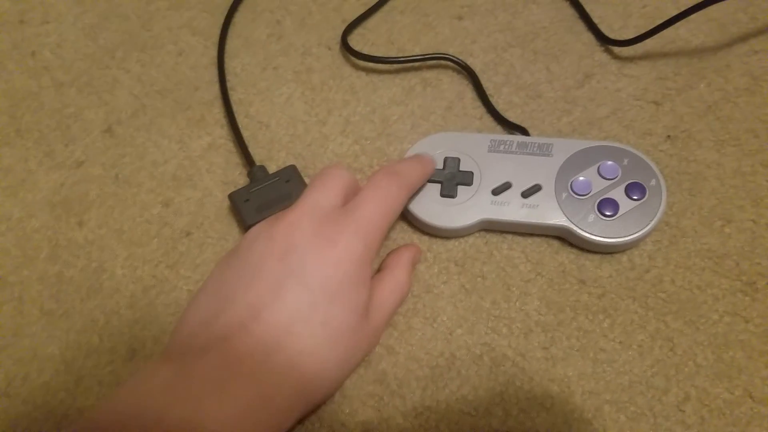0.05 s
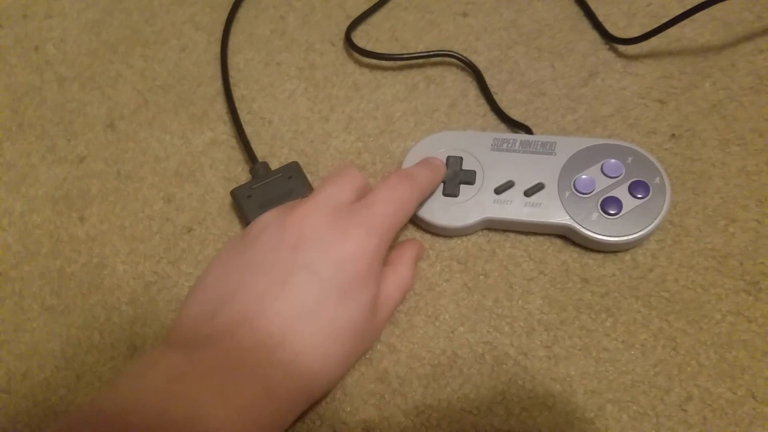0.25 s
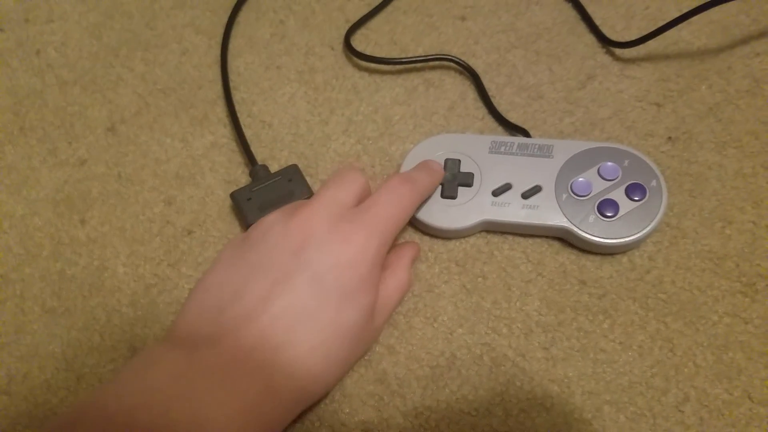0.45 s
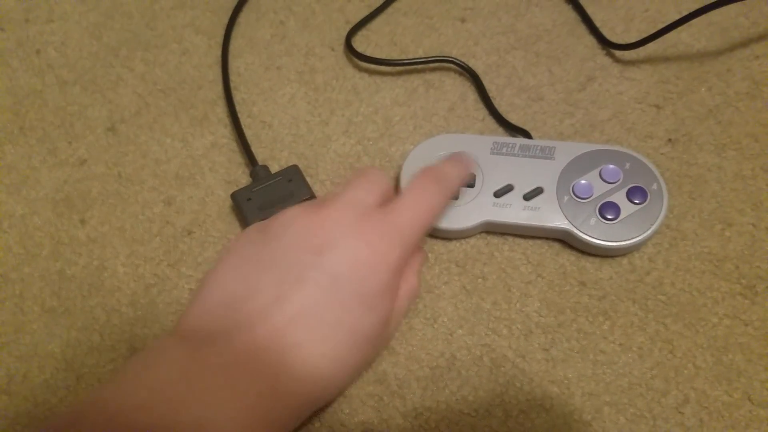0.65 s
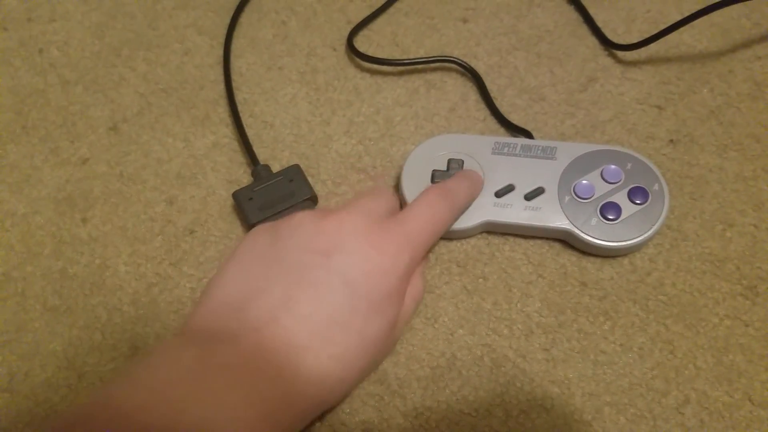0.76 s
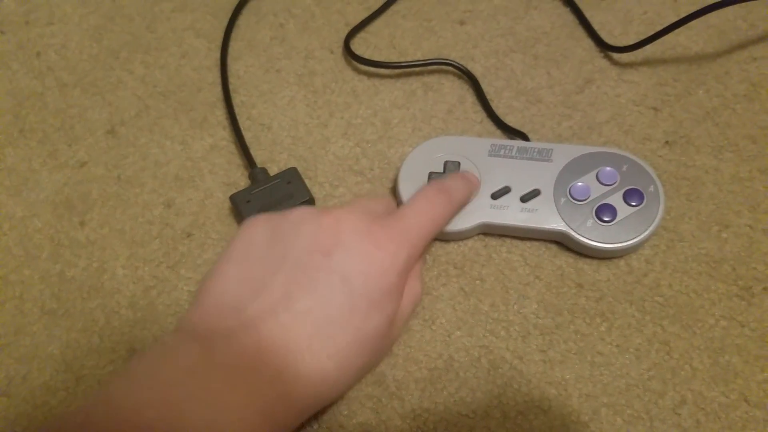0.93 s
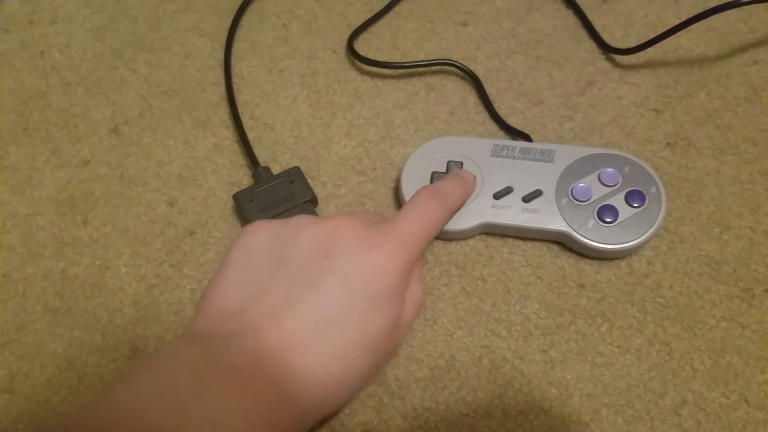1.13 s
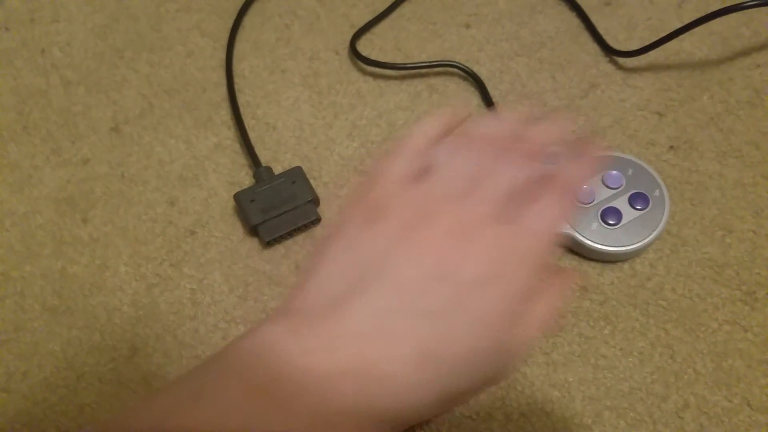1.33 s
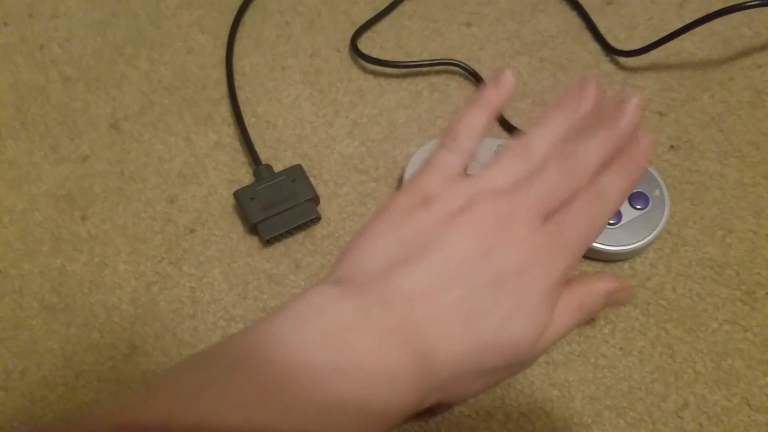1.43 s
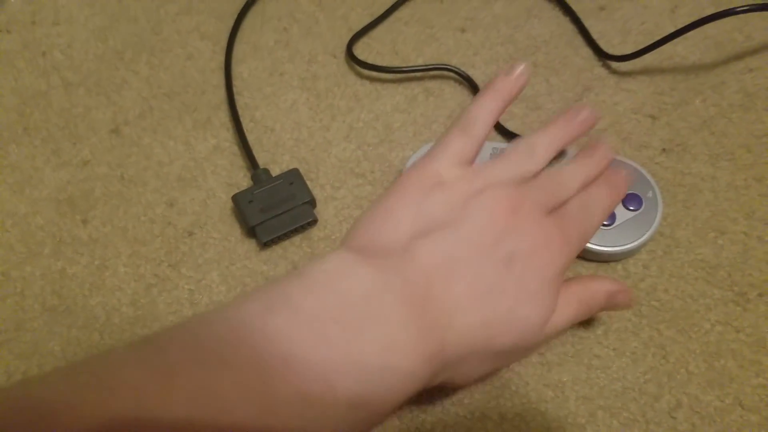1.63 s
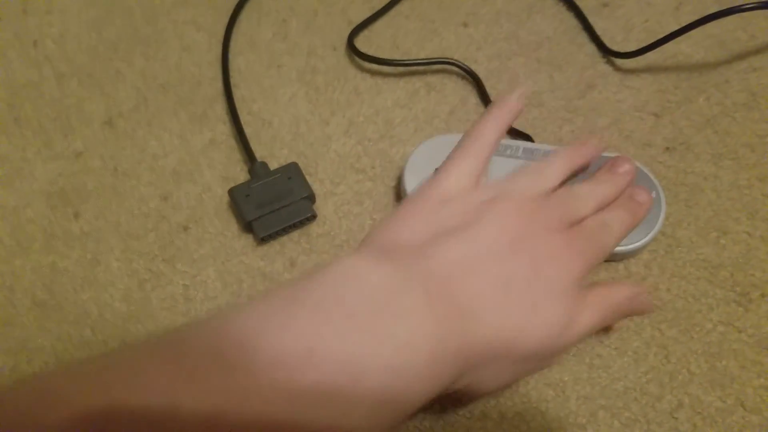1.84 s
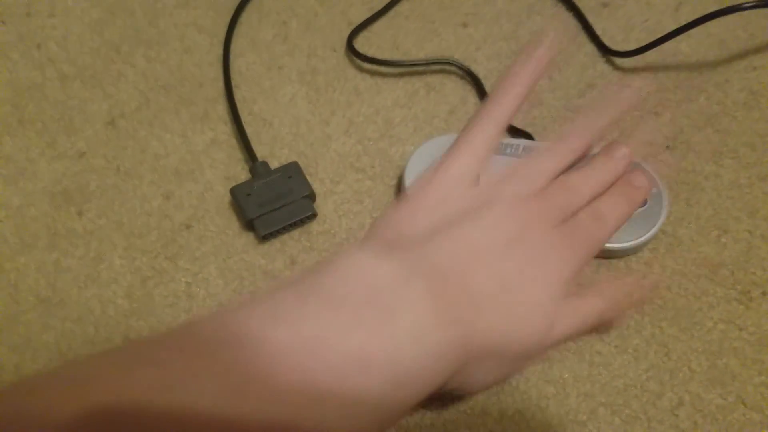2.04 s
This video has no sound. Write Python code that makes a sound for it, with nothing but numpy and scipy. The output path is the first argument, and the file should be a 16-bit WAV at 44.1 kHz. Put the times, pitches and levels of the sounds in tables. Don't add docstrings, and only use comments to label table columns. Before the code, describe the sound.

Small plastic clicks from a game controller's direction pad, then three rattling hand slaps on it

```python
import sys
import numpy as np
from scipy import signal
from scipy.fft import rfft, irfft
from scipy.io import wavfile

SR = 44100
rng = np.random.default_rng(int(sys.argv[2]) if len(sys.argv) > 2 else 0)


def nominal_scale(level):
    x = np.asarray(level, float) / 20
    return 10 ** x


def waveform_to_disk(signal):
    frames = np.transpose(np.atleast_2d(signal))
    scaled = np.clip(frames, -1, 1) * 32767
    samples = np.round(scaled).astype(np.int16)
    wavfile.write(sys.argv[1], SR, samples)


N = 91728

# (frequency [Hz], density [dB per Hz])
AIR_SPECTRUM = [(25, -7), (100, 2.5), (300, 2), (800, -5), (2000, -9), (5000, -17.5), (9500, -26.5),
                (13000, -16)]
# (frequency [Hz], likeness [-1..1])
AIR_LIKENESS = [(60, 0.9), (130, 0), (300, 0.3), (700, 0.11), (15000, 0)]
AIR_DB, HISS_CUT_HZ = -67.5, 16100
HUM_HZ, HUM_WIDTH_HZ, HUM_DB, HUM_STEADY_DB = 109, 31, -74, -69.5

ROOM_T60_S, ROOM_TREBLE_T60_S, FIRST_ECHO_S = 0.21, 0.093, 0.004
WALL_CUT_HZ, ROOM_DB, ROOM_BASS_DB = 2700, -7.5, -3.5

# (time [s], level [dB])
RUB_LEVEL = [
    (.05, -92),
    (0.172, -66),
    (.3, -74),
    (.45, -67.5),
    (.58, -71.5),
    (0.681, -92),
    (0.898, -78.5),
    (1.199, -77.5),
    (1.352, -84.5),
]
# (frequency [Hz], width [Hz], level [dB])
RUB_RINGS = [(1850, 270, -2.5), (2940, 500, -11)]

# (time [s], level [dB], ring [Hz], brightness [dB])
DOME_TICKS = [
    (.1296, -45, 2130, -67),
    (.3748, -32, 2400, -36),
    (.7208, -26, 2660, -62),
    (1.1268, -56.5, 1520, -7),
]
# (time [s], level [dB], ring [Hz], brightness [dB])
STOP_HITS = [
    (.6988, -51.5, 1760, -5.5),
    (.7300, -31.5, 1823, -5.5),
    (.9765, -37.5, 1850, -28),
    (.9785, -38, 1850, 2),
    (.9812, -28, 1850, 2),
    (.9986, -29, 1850, -3.5),
]
# (time [s], level [dB], ring [Hz], brightness [dB])
KEY_KNOCKS = [(1.4305, -40, 1890, 14), (1.4348, -28, 1955, 7), (1.4392, -30, 1944, -6),
              (1.453, -31, 3240, -2), (1.458, -30.5, 1860, -8), (1.5752, -49, 5400, -8),
              (1.5795, -54, 2300, 3), (1.588, -41.5, 2250, 7.5), (1.5962, -38, 2170, 2),
              (1.757, -30, 1800, -25), (1.769, -44, 4170, -3), (1.8332, -40, 5130, -21),
              (1.838, -49, 2700, -25), (1.842, -40.5, 2230, -11), (1.860, -36.5, 3130, -5),
              (1.8625, -41, 1920, -14), (1.869, -43, 2370, -6), (1.876, -36, 2177, -3),
              (1.8785, -30, 2165, -12), (1.895, -52, 1430, -8), (2.0042, -22.5, 3450, 17),
              (2.0062, -27, 2030, 1), (2.0195, -22.5, 2860, -10), (2.0222, -22.5, 2860, -18),
              (2.042, -32.5, 1830, -13), (1.4264, -33, 5580, 0), (1.7295, -24.5, 2110, 7)]
# (frequency ratio, level [dB])
DOME_PARTIALS = [(.7, -29), (1.0, 1.5), (1.3, 4), (1.65, -13.5), (2.1, -66), (2.8, -4)]
# (frequency ratio, level [dB])
STOP_PARTIALS = [(1.0, -2), (1.55, -7), (2.2, 1), (3.05, -6.5), (4.45, -10), (6.0, -8)]
# (frequency ratio, level [dB])
KNOCK_PARTIALS = [(.7, -7.5), (1.0, 1.5), (1.45, -3), (2.15, -0.5), (2.9, -1.5), (4.0, -41)]
DOME_T60_S, STOP_T60_S, KNOCK_T60_S, SNAP_T60_S = 0.0045, 0.006, 0.0045, 0.0073
KEY_SLIPS_S, KNOCK_SLIPS_S = 0.0015, 0.003
KEY_LOW_CUT_HZ = 1483

# (time [s], level [dB])
RATTLE_STARTS = [
    (0.9787, -45.5),
    (1.4262, -25.5),
    (1.588, -55),
    (1.7269, -21.5),
    (1.8355, -56.5),
    (1.859, -50),
    (1.877, -39.5),
    (2.0040, -23),
]
# (frequency [Hz], level [dB], T60 [s])
SHELL_MODES = [(1408, -7.5, 0.012), (1708, -18, 0.032), (1983, -8, 0.0074), (2574, -5, 0.0052),
               (3090, -15.5, 0.021), (4120, -5.5, 0.0096), (4986, -8, 0.0087), (5810, -4.5, 0.0037),
               (6930, 1.5, 0.0017), (8540, 4, 0.0018), (10830, 1, 0.0026), (13830, 3.5, 0.0027),
               (15000, -20, .003)]
RATTLE_PER_S, RATTLE_FAST_T60_S, RATTLE_SLOW_T60_S, RATTLE_SLOW_DB = 15000, 0.013, 0.16, -13

# (time [s], deep [dB], body [dB], hollow [dB], pitch ratio)
PALM_PUSHES = [
    (.722, -54.5, -61, -55, 0.99),
    (.98, -53, -48, -58, 0.91),
    (1.430, -31.5, -36, -39.5, 0.94),
    (1.442, -49, -44, -39, 1.08),
    (1.598, -82, -57.5, -55, 1.1),
    (1.7291, -28, -20, -26.5, 0.93),
    (1.878, -66, -78, -42, 1.1),
    (2.0054, -35.5, -21.5, -23.5, 1.093),
    (2.023, -41, -39.5, -44.5, 1.47),
]
# (frequency [Hz], level [dB], T60 [s])
CARPET_MODES = [(109.3, -8, 0.14), (145.5, -2.5, 0.088)]
# (frequency [Hz], level [dB], T60 [s])
FLEX_MODES = [(218, -3.5, 0.028), (341.7, 3, 0.019), (428.5, -18.5, 0.073)]
# (frequency [Hz], level [dB], T60 [s])
CAVITY_MODES = [(674, 4.5, .03), (772, 9, .02)]
PALM_S, THUMP_CUT_HZ, HOLLOW_CUT_HZ = 0.0013, 117.3, 530

# (frequency [Hz], level [dB])
SHADOW = [(60, -1), (250, -5), (900, -2), (2000, -8.5), (4000, -11), (8000, -12), (12500, 0)]
LEFT_LAG_S, LAG_FROM_HZ, LAG_TOP_RAD, SCATTER_DB = 0.00016, 1100, 1.8, -9
LIMIT = 0.45


def cut(x, hz, kind, order=2):
    return signal.sosfilt(signal.butter(order, hz, kind, fs=SR, output="sos"), x)


def rms_one(x):
    return x / np.sqrt(np.mean(x ** 2) + 1e-20)


def at_hz(points, hz):
    table = np.array(points)
    return np.interp(np.log(hz), np.log(table[:, 0]), table[:, 1])


def ring(clicks, hz, t60):
    radius = nominal_scale(-60 / (t60 * SR))
    w = 2 * np.pi * min(hz, 19000) / SR
    return signal.lfilter([0, np.sin(w)], [1, -2 * radius * np.cos(w), radius * radius], clicks + 1e-18)


def narrow(x, hz, width_hz):
    return rms_one(ring(x, hz, np.log(1000) / (np.pi * width_hz)))


def air():
    edges = 22 * 2 ** np.arange(0, 9.8, .5)
    white = rng.standard_normal((2, 2, N))
    noise = 0
    for k, (low, high) in enumerate(zip(edges, edges[1:])):
        band = signal.butter(2, [low, high], "band", fs=SR, output="sos")
        mid, side = signal.sosfilt(band, white[k % 2])
        hz = np.sqrt(low * high)
        alike = np.clip(at_hz(AIR_LIKENESS, hz), -1, 1)
        stereo = np.sqrt(1 + alike) * mid + np.sqrt(1 - alike) * side * [[1], [-1]]
        noise = noise + nominal_scale(at_hz(AIR_SPECTRUM, hz)) * stereo
    top = signal.cheby2(10, 40, HISS_CUT_HZ, fs=SR, output="sos")
    hiss = nominal_scale(AIR_DB) * signal.sosfilt(top, rms_one(noise))
    wavering = nominal_scale(HUM_DB) * narrow(rng.standard_normal(N), HUM_HZ, HUM_WIDTH_HZ)
    steady = nominal_scale(HUM_STEADY_DB) * np.sin(2 * np.pi * HUM_HZ * np.arange(N) / SR)
    return hiss + (wavering + steady) * nominal_scale([[-.7], [.7]])


def room(x):
    t = np.arange(SR // 2) / SR
    noise = rng.standard_normal((3, len(t)))
    dull = cut(noise[1:], WALL_CUT_HZ, "low", order=1)
    bass = nominal_scale(ROOM_BASS_DB) * cut(noise[0], LAG_FROM_HZ, "low")
    tail = (cut(dull, LAG_FROM_HZ, "high") + bass) * nominal_scale(-60 * t / ROOM_T60_S)
    tail = tail + (noise[1:] - dull) * nominal_scale(-60 * t / ROOM_TREBLE_T60_S)
    tail *= (1 - np.exp(-(t / FIRST_ECHO_S) ** 2)) / np.sqrt(.015 * SR)
    return signal.fftconvolve(tail, x[None], axes=1)[:, :N]


def rub():
    grain = rng.standard_normal(N) * rng.exponential(1, N)
    level = nominal_scale(np.interp(np.arange(N) / SR, *np.transpose(RUB_LEVEL)))
    return level * sum(nominal_scale(db) * narrow(grain, hz, width) for hz, width, db in RUB_RINGS)


def key_contacts(rows, partials, t60, slips_s, count):
    out = np.zeros(N + SR)
    t = np.arange(2048) / SR
    for s, db, hz, bright_db in rows:
        when_draw, force_draw, pitch_draw = rng.random((3, 16))
        hiss = rng.standard_normal(2048)
        when = np.r_[0, when_draw[1:count]]
        force = np.r_[-np.sqrt(5 / count), force_draw[1:count] * 2 - 1]
        slips = np.zeros(2048)
        slips[(when * slips_s * SR).astype(int)] = force * (1 - .5 * when) * np.sqrt(5 / count)
        snap_shape = nominal_scale(-60 * t / SNAP_T60_S) * np.minimum(t / .0003, 1)
        body = nominal_scale(bright_db - 6) * np.diff(hiss, prepend=0) * snap_shape
        for k, (ratio, part_db) in enumerate(partials):
            tilt_db = 0.67 * bright_db * max(np.log2(ratio), 0)
            part_hz = hz * ratio * (.97 + .06 * pitch_draw[k])
            body += nominal_scale(part_db + tilt_db) * ring(slips, part_hz, t60 / ratio ** .3)
        i = int(s * SR)
        out[i:i + 2048] += nominal_scale(db) * body
    return cut(out[:N], KEY_LOW_CUT_HZ, "high", order=4)


def rattle():
    t = np.arange(N) / SR
    shower = np.zeros(N)
    for s, db in RATTLE_STARTS:
        since = np.maximum(t - s, 0)
        fast = nominal_scale(-60 * since / RATTLE_FAST_T60_S)
        slow = nominal_scale(RATTLE_SLOW_DB - 60 * since / RATTLE_SLOW_T60_S)
        shower += (t >= s) * nominal_scale(db) * (fast + slow)
    struck = rng.random(N) < RATTLE_PER_S / SR
    hits = struck * nominal_scale(2.74 * np.minimum(rng.exponential(1, N), 4)) * shower
    shell = sum(nominal_scale(db - 12.5) * ring(hits * rng.standard_normal(N), hz, t60) for hz, db, t60 in SHELL_MODES)
    return cut(shell, KEY_LOW_CUT_HZ, "high", order=3)


def slaps():
    t = np.arange(N) / SR
    out = np.zeros((3, N))
    for s, *levels_db, ratio in PALM_PUSHES:
        push = np.exp(-.5 * ((t - s) / (PALM_S / 4)) ** 2)
        push = push / push.sum()
        for k, modes in enumerate((CARPET_MODES, FLEX_MODES, CAVITY_MODES)):
            out[k] -= sum(nominal_scale(db + levels_db[k]) * ring(push, hz * ratio, t60) for hz, db, t60 in modes)
    deep, body, hollow = out
    return cut(deep + body, THUMP_CUT_HZ, "high", order=4) + cut(hollow, HOLLOW_CUT_HZ, "high")


def at_microphones(pad):
    hz = np.arange(1, N // 2 + 2) * SR / N
    phase = 2 * np.pi * LEFT_LAG_S * hz ** 3 / (hz ** 2 + LAG_FROM_HZ ** 2)
    lag = np.exp(-1j * LAG_TOP_RAD * np.tanh(phase / LAG_TOP_RAD))
    tilt = nominal_scale(at_hz(SHADOW, hz) / 2)
    echoes = rng.standard_normal((2, 400)) * np.exp(-np.arange(400) / 120) / np.sqrt(60)
    treble = cut(pad, LAG_FROM_HZ, "high")
    scatter = np.array([signal.lfilter(e, [1], treble) for e in echoes])
    near = rfft(pad + nominal_scale(SCATTER_DB) * scatter) * np.array([tilt * lag, 1 / tilt])
    return irfft(near, N)


def scene():
    pad = rub()
    pad = pad + key_contacts(DOME_TICKS, DOME_PARTIALS, DOME_T60_S, KEY_SLIPS_S, count=5)
    pad = pad + key_contacts(STOP_HITS, STOP_PARTIALS, STOP_T60_S, KEY_SLIPS_S, count=8)
    pad = pad + key_contacts(KEY_KNOCKS, KNOCK_PARTIALS, KNOCK_T60_S, KNOCK_SLIPS_S, count=16)
    pad = pad + rattle() + slaps()
    return at_microphones(pad) + nominal_scale(ROOM_DB) * room(pad) + air()


def band_limit(x):
    return signal.sosfilt(signal.butter(12, 17070, fs=SR, output="sos"), x)


def record(dry):
    soft = LIMIT * np.tanh(dry / LIMIT)
    mix = signal.sosfilt(signal.cheby2(12, 50, 16900, fs=SR, output="sos"), soft)
    return band_limit(mix)


dry = scene()
out = record(dry)
waveform_to_disk(out)
```